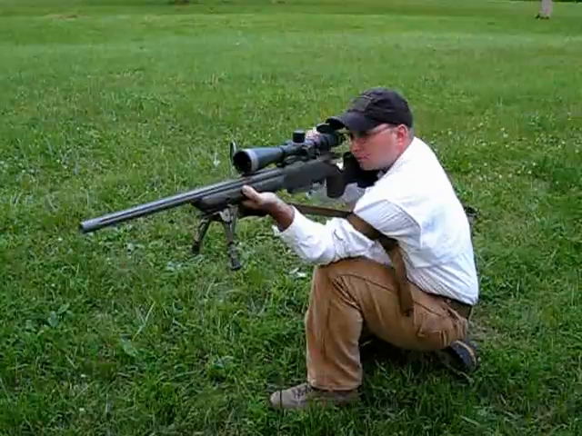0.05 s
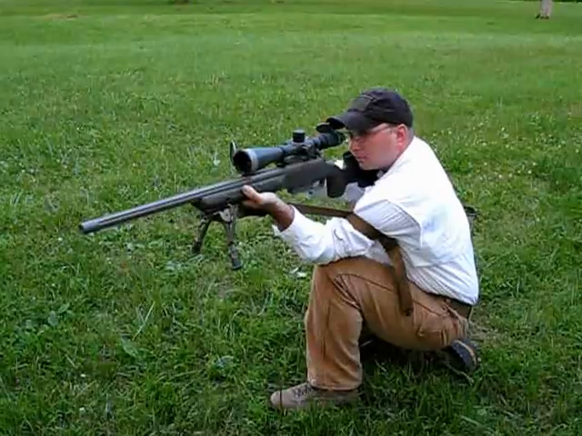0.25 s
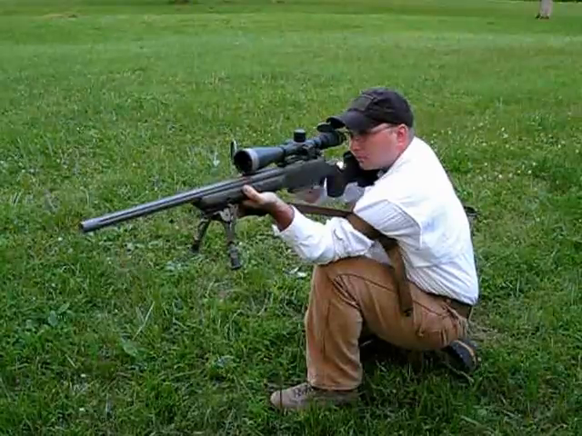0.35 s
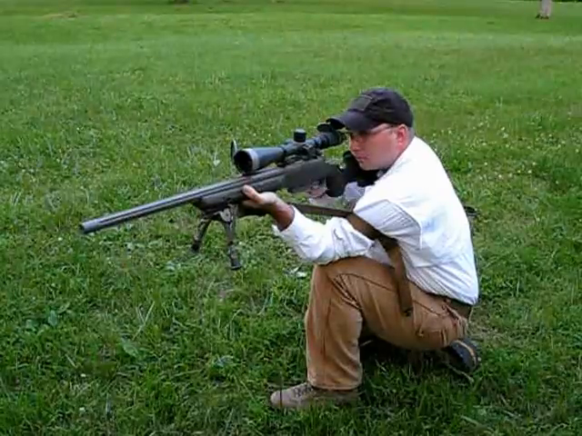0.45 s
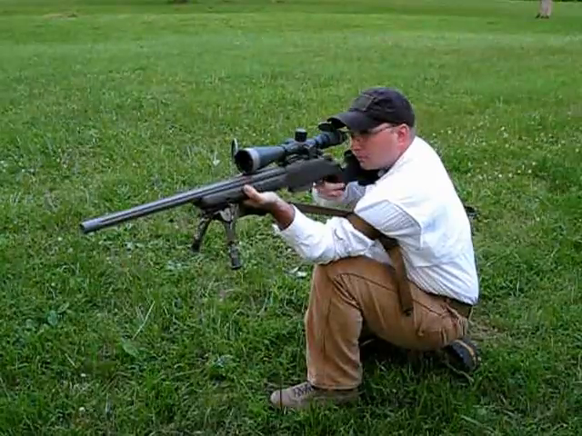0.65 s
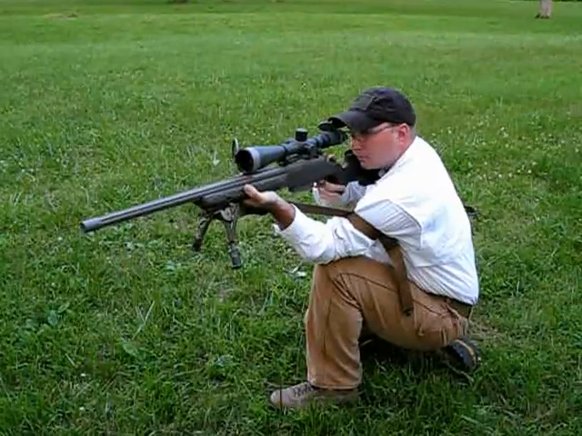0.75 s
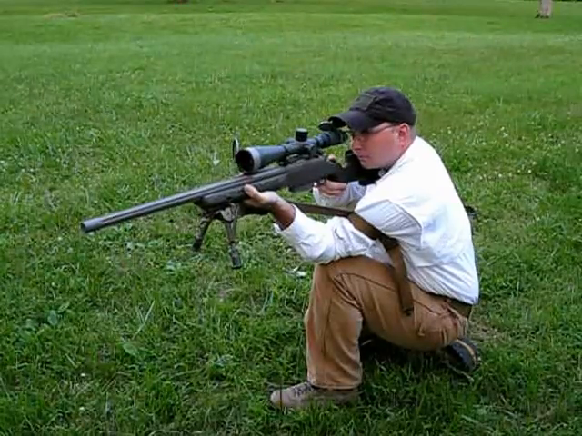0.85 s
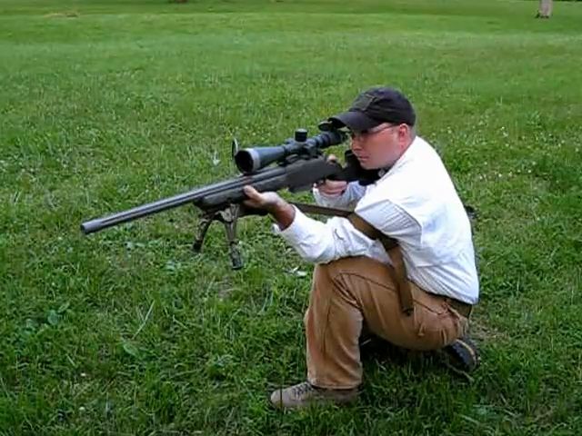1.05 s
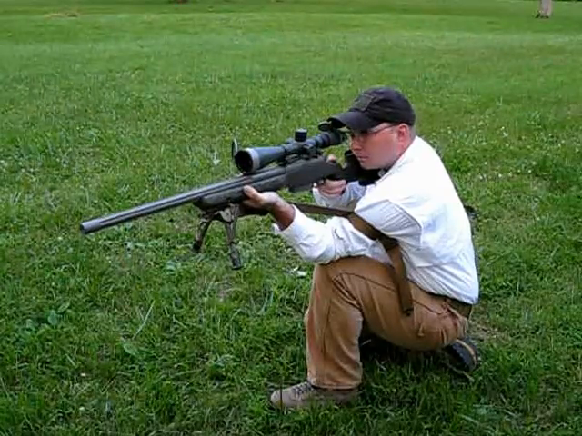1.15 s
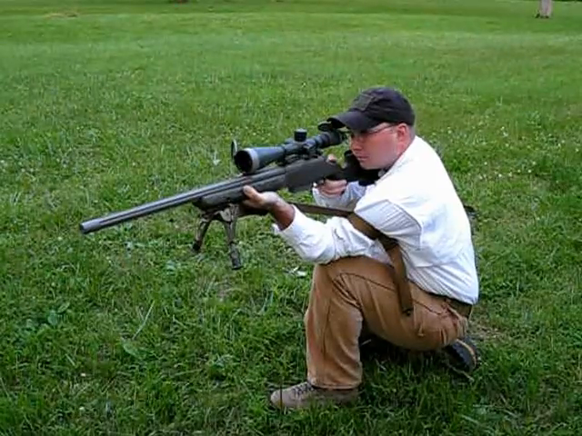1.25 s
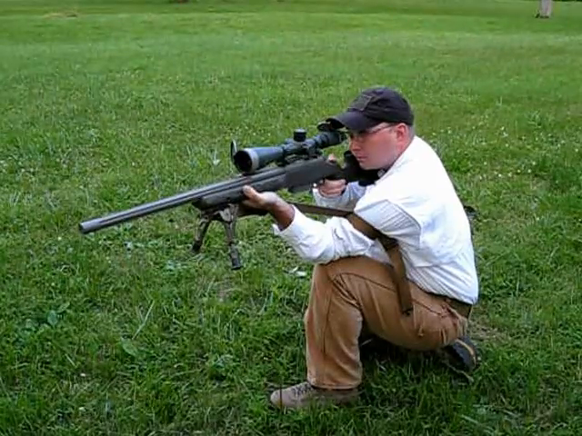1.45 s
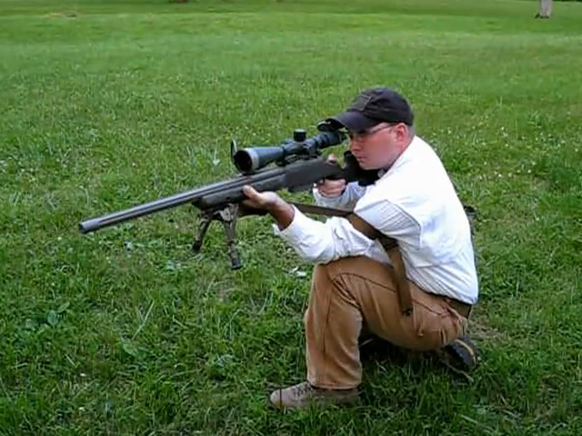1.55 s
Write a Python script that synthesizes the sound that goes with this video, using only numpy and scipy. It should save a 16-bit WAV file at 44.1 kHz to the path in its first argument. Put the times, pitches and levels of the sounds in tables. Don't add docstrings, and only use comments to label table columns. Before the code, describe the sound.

A rifle bolt is cycled close to the microphone: a light scrape and loose knock at 0.1 s, a hard crack against the stop at 0.23, a quick rattle at 0.31, small catch clicks at 0.35, and the loudest locking clack at 0.40, scraping away by 0.6. Distant birds whistle at the start and around 0.7-0.9, trill thinly at 1.1, and give a burred note at 1.25, over faint steady traffic and hum.

```python
import sys
import numpy as np
from scipy import signal
from scipy.fft import rfft, irfft
from scipy.io import wavfile
from scipy.ndimage import uniform_filter1d

SR = 44100
rng = np.random.default_rng(int(sys.argv[2]) if len(sys.argv) > 2 else 0)


def amplitude_ratio(level_db):
    exponent = np.asarray(level_db, float) / 20
    return 10 ** exponent


def dump_mix(stems):
    frames = np.atleast_2d(stems).T
    limited = np.clip(frames, -1, 1)
    pcm = np.round(limited * 32767).astype(np.int16)
    wavfile.write(sys.argv[1], SR, pcm)


N = 70560

# (frequency [Hz], density [dB per Hz])
TRAFFIC_SPECTRUM = [(88, -28), (150, -15), (291, -7), (448, -8.5), (637, -5.5), (998, -0.5), (1600, -7.5),
                    (11900, -27), (16000, -33)]
# (frequency [Hz], density [dB per Hz])
RUMBLE_SPECTRUM = [(15, -76), (25, -49), (50, -39), (97, -9), (140, 0), (195, 0), (250, -4), (320, -70),
                   (550, -120)]
# (frequency [Hz], bandwidth [Hz], level [dB])
ENGINE_HUM = [(105.8, 14, -57.5), (70.8, 12, -65)]

# (start [s], rise [s], fall [s], level [dB], share of rail ringing [0-1])
STROKES = [
    (-.03, 0.042, 0.13, -42, 0.1),
    (0.089, 0.0134, 0.28, -49, 0.4),
    (0.179, 0.013, 0.0082, -39, 0.11),
    (0.234, 0.0032, 0.046, -41.5, 0),
    (0.252, 0.039, 0.14, -38.5, 0.43),
    (0.412, 0.00324, 0.04, -41, 1),
    (0.431, 0.011, .165, -41.5, 0.78),
]
# (frequency [Hz], density [dB per Hz])
FRICTION_HISS = [(590, -20), (1000, -8), (2330, -1), (2780, -8), (5380, -5.5), (13400, -11.5), (16000, -19)]
# (frequency [Hz], bandwidth [Hz], level [dB])
RAIL_MODES = [(2730, 140, 6), (3480, 200, -2), (4000, 134, -0.5), (5320, 630, -0.5), (7160, 295, -1.5),
              (7700, 195, -24.5), (10260, 360, -14), (10600, 420, -13.5)]

# (start [s], length [s], level [dB], first frequency [Hz], last frequency [Hz])
WHISTLES = [(.008, 0.05, -42, 3500, 2912), (.048, .075, -49, 2567, 2280), (.118, 0.013, -43.5, 2720, 2600),
            (0.062, 0.061, -50.5, 2960, 2865), (.679, 0.026, -49.5, 2910, 3050),
            (.733, 0.0379, -48, 2955, 2850), (.777, 0.031, -46, 2580, 2307), (.826, 0.023, -54, 2326, 2450),
            (.852, 0.0285, -55, 2240, 2140), (.822, 0.021, -57, 3320, 3170),
            (.85, 0.018, -63.5, 3240, 3480)]
# (start [s], length [s], level [dB], frequency [Hz], bandwidth [Hz])
TRILL = [(1.108, 0.19, -63.5, 7100, 300), (1.127, 0.18, -62, 7600, 250)]
# (start [s], length [s], level [dB], first frequency [Hz], last frequency [Hz], buzz [Hz])
BURRED_NOTES = [
    (1.254, .032, -46.5, 3550, 2700, 260),
]

# (time [s], level [dB], rise [s], brightness [dB per octave])
RATTLE_BLOWS = [
    (.0945, -27, .0007, -0.5),
    (.3108, -20, .0009, -3.5),
    (.3135, -19, 0.000326, 10.5),
    (.3153, -7.5, 0.000164, 2),
    (.3178, -28.5, .0004, 3.33),
    (.3197, -18.5, 0.00023, 5),
    (.3222, -15, 0.00046, -6),
    (.3248, -16, .0003, -8),
    (.3276, -20, 0.0005, -5.5),
    (.3315, -27, 0.00052, -10),
]
STOP_BLOWS = [
    (.1979, -23.5, 0.00032, -6.5),
    (.2262, -8, .0007, -9.5),
    (.2275, -1.5, 0.000167, -0.2),
    (.2287, -4, 0.00013, 1.7),
    (.2302, -14.5, 0.0001, -5.5),
    (.2323, -10, 0.000164, -3),
    (.2338, -27, 0.00026, -12),
    (.2358, -20, 0.0009, -5),
    (.2385, -27, 0.00036, -9),
]
CATCH_BLOWS = [
    (.204, -22.5, 0.00078, -5.5),
    (.218, -27.5, 0.00033, -15.5),
    (.3465, -21, .0008, -11),
    (.348, -22, 0.00046, -2),
    (.3518, -14.5, 0.0005, -2.2),
    (.353, -14, 0.0006, -5.5),
    (.3575, -25, 0.0011, 1),
]
LOCK_BLOWS = [
    (.4019, -13, 0.00068, -19.5),
    (.4028, 3.3, .0004, 1.1),
    (.4042, -4.5, 0.00015, 1),
    (.4063, -6.5, 0.00022, -1.5),
    (.4082, -26, 0.00057, 0),
    (.4105, -15, .001, -3),
]
# (frequency [Hz], bandwidth [Hz], level [dB])
RATTLE_MODES = [(657, 28, -10.5), (975, 230, -4.5), (1710, 250, -3), (2040, 440, -3.5), (2700, 370, 2.5),
                (3370, 300, 0), (4800, 180, -.4), (5960, 230, -8), (6800, 370, -13), (7650, 246, -19),
                (8300, 300, -18), (9640, 200, -35), (10500, 300, -27)]
STOP_MODES = [(1180, 164, -12), (2070, 220, -8), (2710, 350, 4.5), (3110, 550, 7.5), (3450, 120, -1.5),
              (4440, 200, 3), (4825, 150, 13), (6100, 280, -6), (7200, 290, 7), (9160, 260, -20),
              (10270, 340, -2), (12400, 420, -1), (13700, 500, -12.5)]
CATCH_MODES = [(660, 80, -16.5), (1750, 200, -23), (2300, 380, -4), (2720, 220, 7), (3194, 120, -9),
               (4330, 230, -19), (5060, 190, -5), (5810, 140, -6), (7000, 300, -13), (7960, 490, -18),
               (9600, 300, -30.5), (11200, 300, -28)]
LOCK_MODES = [(750, 280, -17), (928, 280, -4.5), (1415, 72, -15), (1762, 130, -9), (2815, 204, -1),
              (3405, 340, 1.7), (4180, 110, -13), (5230, 140, -1.5), (5830, 150, -22), (7070, 170, -11),
              (8670, 340, -38), (9930, 89, -15), (11900, 400, -16), (13100, 345, -12)]
# (frequency [Hz], density [dB per Hz])
RATTLE_CRACK = [(300, -56), (700, -34), (1250, -10), (2020, 4), (3560, -2), (4200, -15), (4860, -9),
                (16000, -51)]
STOP_CRACK = [(500, -38), (1000, -23.5), (1600, -9), (2710, -6), (5800, -5.5), (7230, -5), (10000, -11),
              (16500, -21)]
CATCH_CRACK = [(400, -40), (800, -12.5), (1420, -22), (2650, 2.5), (3980, -10), (5880, -1.5), (16000, -50)]
LOCK_CRACK = [(600, -52), (1100, -17), (2000, -5.5), (2750, 3), (3400, -9.5), (5190, -8.5), (13000, -30),
              (16500, -13)]

# (time [s], length [s], peak [dB])
SHOVES = [
    (.2284, 0.00085, -15.5),
    (0.411, 0.00091, -44),
]


def evened(x):
    return x / np.sqrt(np.mean(x ** 2) + 1e-20)


def add(mix, start_s, sound):
    at = round(start_s * SR)
    part = mix[max(at, 0):][:len(sound) + min(at, 0)]
    part += sound[max(-at, 0):][:len(part)]


def coloured(x, spectrum):
    points_hz, points_db = np.transpose(spectrum)
    hz = np.fft.rfftfreq(len(x), 1 / SR)
    gain_db = np.interp(np.log(hz + 1), np.log(points_hz), points_db, -90, -90)
    return evened(irfft(rfft(x) * amplitude_ratio(gain_db), len(x)))


def resonate(x, hz, width):
    r = np.exp(-np.pi * width / SR)
    return 2 * signal.lfilter([1 - r], [1, -r * np.exp(2j * np.pi * hz / SR)], x).real


def distance():
    z = signal.stft(rng.standard_normal(N + 2048), nperseg=512)[2]
    patches = uniform_filter1d(rng.standard_normal(z.shape), size=10, axis=0)
    patches = evened(uniform_filter1d(patches, size=12, axis=1))
    patchy_noise = signal.istft(z * amplitude_ratio(0.9 * patches), nperseg=512)[1][:N]
    wash = amplitude_ratio(-44.5) * coloured(patchy_noise, TRAFFIC_SPECTRUM)
    rumble = amplitude_ratio(-61) * coloured(rng.standard_normal(N), RUMBLE_SPECTRUM)
    hum = np.zeros(N)
    for hz, width, db in ENGINE_HUM:
        once = resonate(rng.standard_normal(N), hz, width)
        hum += amplitude_ratio(db) * evened(resonate(once, hz, width))
    return wash + rumble + hum


def slides():
    out = np.zeros(N)
    t = np.arange(8192) / SR
    for start, rise, fall, level_db, ring_share in STROKES:
        roughness = evened(uniform_filter1d(rng.standard_normal(len(t)), size=150))
        grit = rng.standard_normal(len(t)) * amplitude_ratio(1.5 * roughness)
        sing = evened(sum(amplitude_ratio(db) * resonate(grit, hz, width) for hz, width, db in RAIL_MODES))
        hiss = coloured(grit, FRICTION_HISS)
        ramp = np.clip(np.minimum(t / rise, 1 - (t - rise) / fall), 0, 1)
        envelope = np.sin(np.pi / 2 * ramp) ** 2
        add(out, start, amplitude_ratio(level_db) * envelope * ((1 - ring_share) * hiss + ring_share * sing))
    return out


def whistles(out):
    for start, length, level_db, first_hz, last_hz in WHISTLES:
        u = np.arange(0, 1, 1 / (length * SR))
        hz = last_hz + (first_hz - last_hz) * (1 - u) ** 2.33
        tone = np.sin(2 * np.pi * np.cumsum(hz) / SR)
        add(out, start, amplitude_ratio(level_db) * np.sqrt(2) * signal.windows.tukey(len(u), 0.21) * tone)


def burred_notes(out):
    for start, length, level_db, first_hz, last_hz, buzz_hz in BURRED_NOTES:
        u = np.arange(0, 1, 1 / (length * SR))
        turns = np.cumsum(first_hz + (last_hz - first_hz) * u) / SR
        turns += 0.15 * np.sin(2 * np.pi * buzz_hz * length * u)
        add(out, start, amplitude_ratio(level_db) * np.sqrt(2) * np.sin(np.pi * u) * np.sin(2 * np.pi * turns))


def among_trees(x):
    t = np.arange(12000) / SR
    decay = np.exp(-t / 0.28 * np.log(10))
    echoes = rng.standard_normal(len(t)) * decay * (t > 0.01)
    return x + amplitude_ratio(-1.5) * signal.fftconvolve(x, echoes / np.linalg.norm(echoes))[:N]


def trill(out):
    for start, length, level_db, hz, width in TRILL:
        noise = rng.standard_normal(16384)[:round(length * SR)]
        thin = evened(resonate(resonate(noise, hz, width), hz, width))
        add(out, start, amplitude_ratio(level_db) * signal.windows.tukey(len(noise), 0.4) * thin)


def birds():
    calls = np.zeros(N)
    whistles(calls)
    burred_notes(calls)
    out = among_trees(calls)
    trill(out)
    return out


def blows(table, modes, crack, crack_db, crack_s, longer=1):
    out = np.zeros(N)
    t = np.arange(4096) / SR
    pivot_hz = 3000
    hz, width, db = np.transpose(modes)[:, :, None]
    decay = np.exp(-np.pi * width * t / longer)
    for start, level_db, rise, tilt_db in table:
        size = amplitude_ratio(db + tilt_db * np.log2(hz / pivot_hz)) * width
        partials = size * decay * np.sin(2 * np.pi * (hz * t + rng.random(hz.shape)))
        ring = partials.sum(0) / np.linalg.norm(size)
        tilted = [(f, g + tilt_db * np.log2(f / pivot_hz)) for f, g in crack]
        noise = coloured(rng.standard_normal(len(t)), tilted)
        snap = amplitude_ratio(crack_db - 60 * t / crack_s) * noise
        add(out, start, amplitude_ratio(level_db) * (1 - np.exp(-t / rise)) * (ring + snap))
    return out


def shoves():
    out = np.zeros(N)
    for start, length, peak_db in SHOVES:
        u = np.arange(0, 1, 1 / (length * SR))
        add(out, start, amplitude_ratio(peak_db) * np.sin(np.pi * u) ** 2)
    return out


def scene():
    soft = distance() + slides() + birds()
    bolt = blows(RATTLE_BLOWS, RATTLE_MODES, RATTLE_CRACK, crack_db=-2.5, crack_s=0.0097)
    bolt += blows(STOP_BLOWS, STOP_MODES, STOP_CRACK, crack_db=0, crack_s=0.01)
    bolt += blows(CATCH_BLOWS, CATCH_MODES, CATCH_CRACK, crack_db=-2.1, crack_s=0.012)
    bolt += blows(LOCK_BLOWS, LOCK_MODES, LOCK_CRACK, crack_db=-3.5, crack_s=0.01, longer=1.32)
    near = signal.lfilter(*signal.butter(2, 110, "high", fs=SR), bolt + shoves())
    return (soft + near)[None]


def top_cut(x):
    return signal.sosfilt(signal.butter(12, 16880, fs=SR, output="sos"), x)


def record(dry):
    overloaded = np.tanh(dry)
    band_limit = signal.firwin(255, 15900, fs=SR)[None]
    mix = signal.oaconvolve(overloaded, band_limit, "same")
    return top_cut(mix)


dry = scene()
out = record(dry)
dump_mix(out)
```